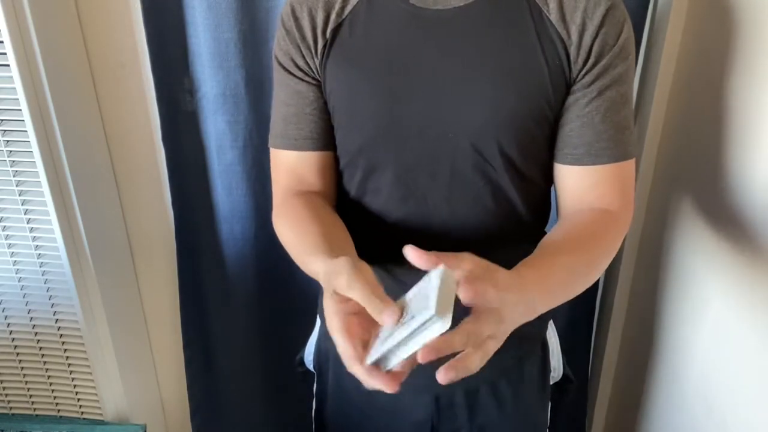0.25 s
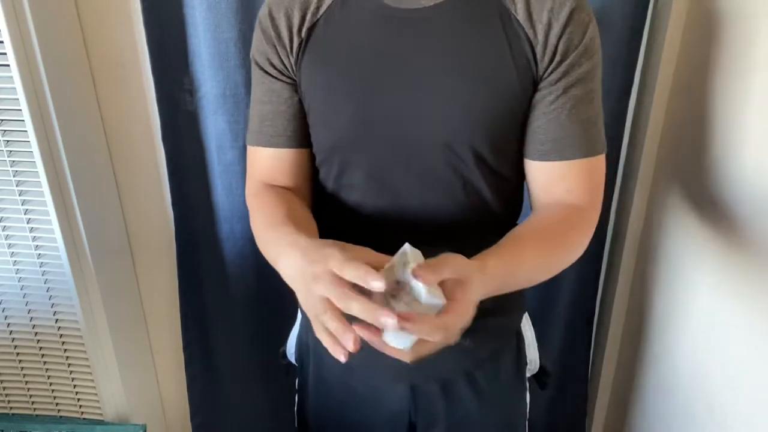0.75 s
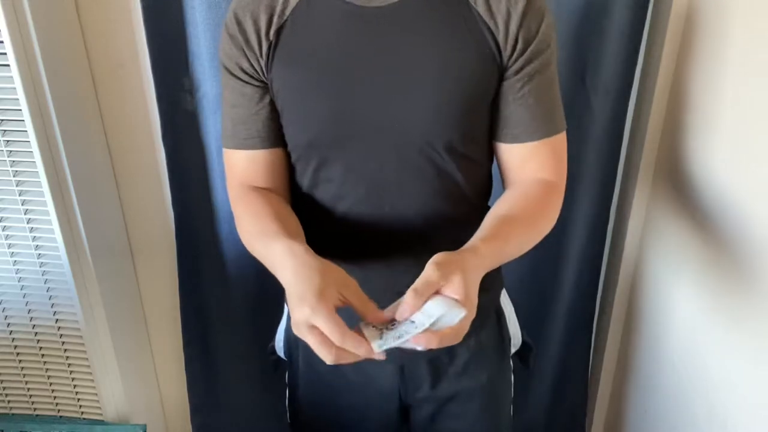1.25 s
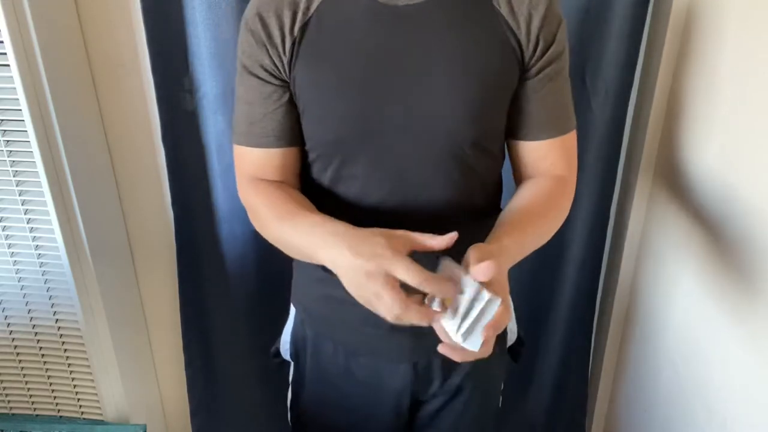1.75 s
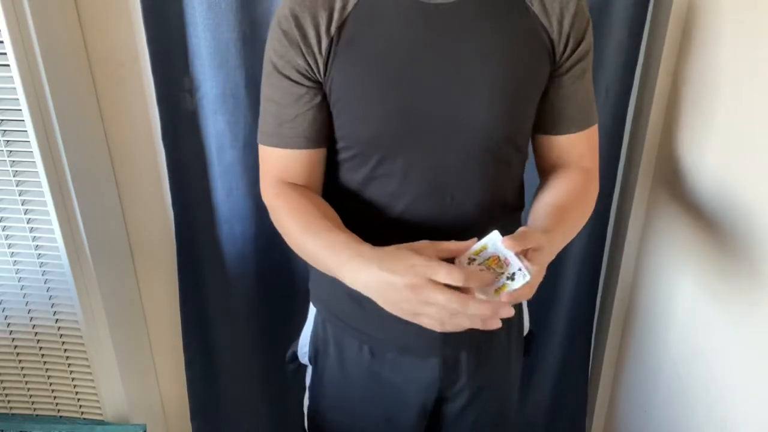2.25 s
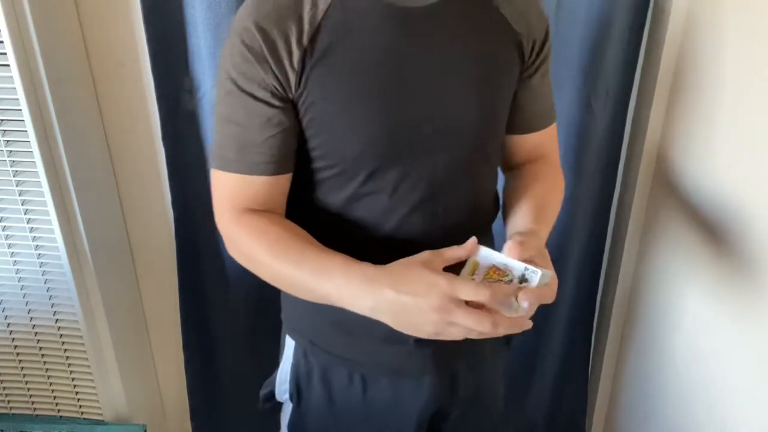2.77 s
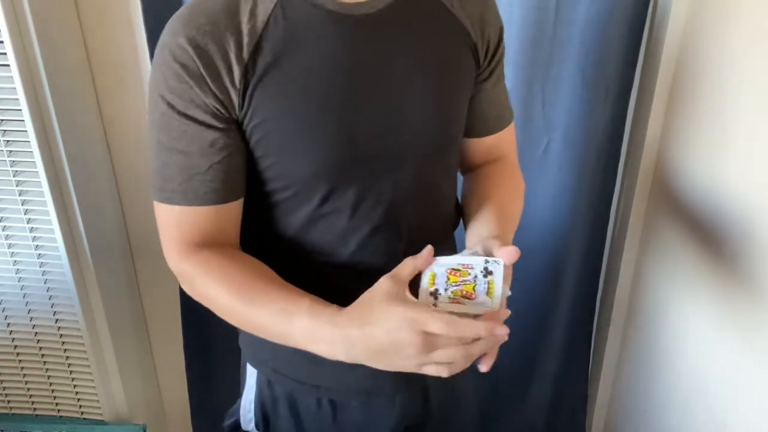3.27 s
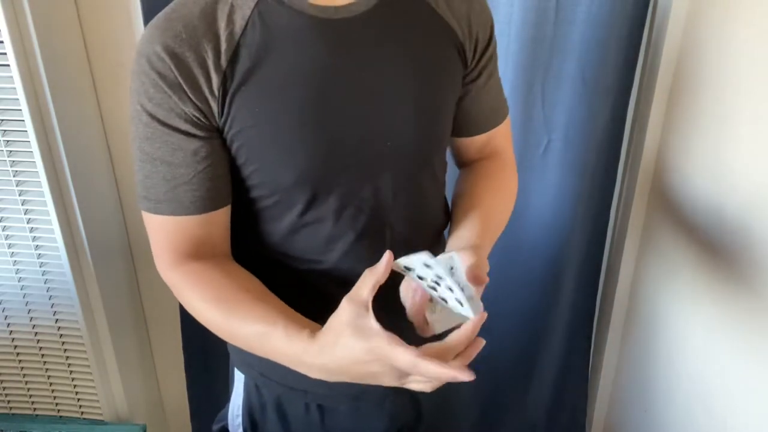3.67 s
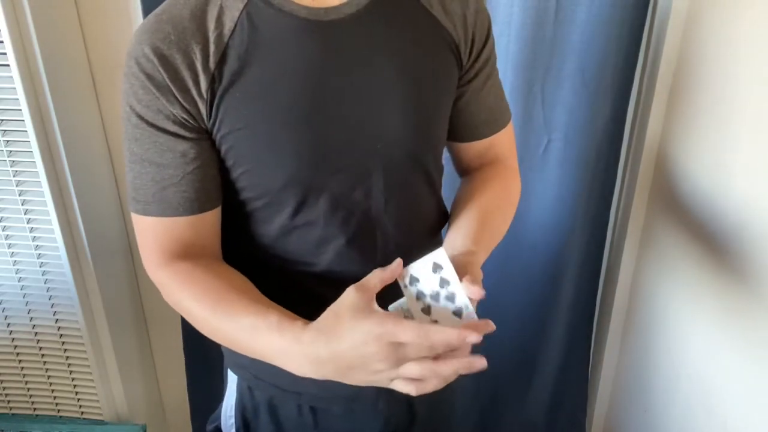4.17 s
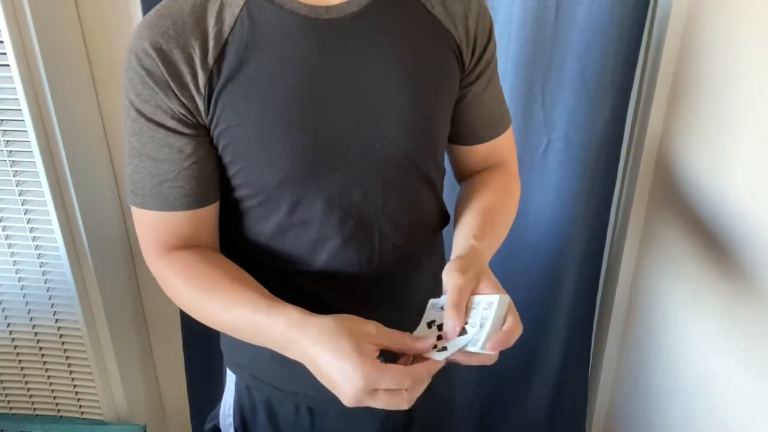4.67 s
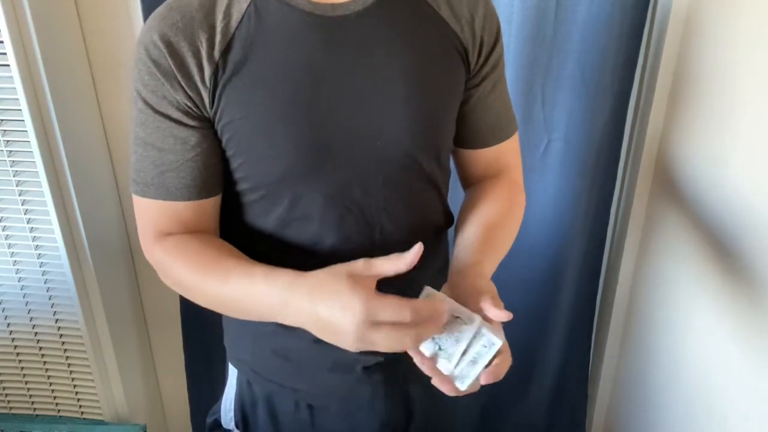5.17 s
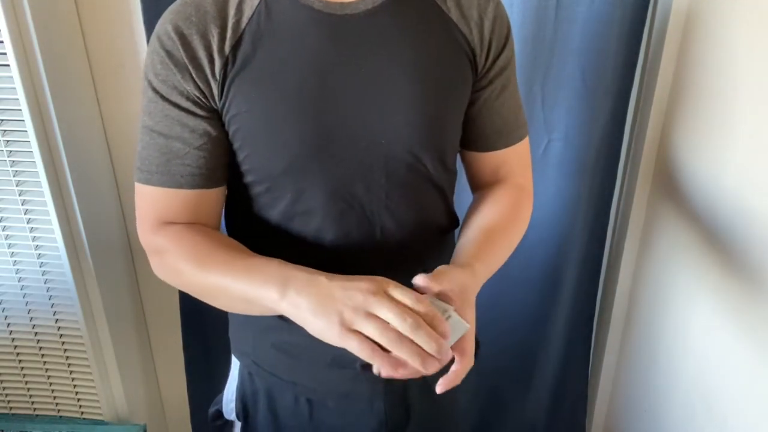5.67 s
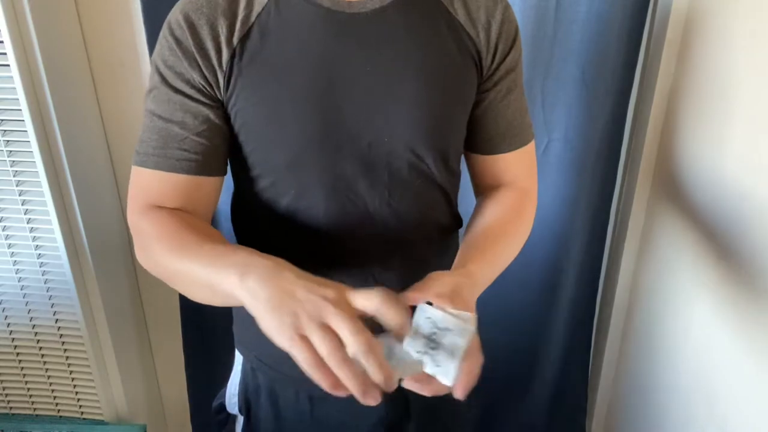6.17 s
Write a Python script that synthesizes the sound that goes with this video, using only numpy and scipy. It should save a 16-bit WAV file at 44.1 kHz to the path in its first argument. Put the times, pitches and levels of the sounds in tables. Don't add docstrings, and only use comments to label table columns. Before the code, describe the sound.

Quiet close handling of a card deck: coated faces hiss, edges tick, a clacking snap and a louder slap, distant motor humming underneath.

```python
import sys
import numpy as np
from scipy import signal
from scipy.fft import rfft, irfft, next_fast_len
from scipy.io import wavfile
from scipy.ndimage import uniform_filter1d

SR = 44100
rng = np.random.default_rng(int(sys.argv[2]) if len(sys.argv) > 2 else 0)


def persist_wave(psi):
    counts = np.round(np.clip(psi, -1, 1) * 32767).astype(np.int16)
    wavfile.write(sys.argv[1], SR, np.atleast_2d(counts).T)


def attenuation_scalar(level_db):
    decades = np.asarray(level_db, float) / 20
    return 10 ** decades


N = 283122
TIME_S = np.arange(N) / SR
FFT_SIZE = next_fast_len(N)
FFT_HZ = np.arange(FFT_SIZE // 2 + 1) * SR / FFT_SIZE


def unit(x):
    return x / np.sqrt(np.mean(x ** 2))


def band(x, low_hz, high_hz):
    edges_hz = [low_hz, min(high_hz, .45 * SR)]
    return signal.sosfilt(signal.butter(2, edges_hz, "band", fs=SR, output="sos"), x)


def colour(x, table):
    pitch_hz, level_db = np.transpose(table)
    gain = attenuation_scalar(np.interp(np.log(FFT_HZ + 1), np.log(pitch_hz), level_db))
    return irfft(rfft(x, FFT_SIZE) * gain, FFT_SIZE)[..., :N]


def walk(rate_hz):
    return 1.2 * np.interp(TIME_S * rate_hz, np.arange(4096), rng.standard_normal(size=4096))


def add(out, start_s, x):
    i = int(round(start_s * SR))
    out[i:i + len(x)] += x[:N - i]


def decay(t, t60_s):
    return np.exp(-np.log(1000) * t / t60_s)


def ring(pitch_hz, t60_s, push_s):
    t = np.arange(int(.15 * SR)) / SR
    return np.sin(2 * np.pi * pitch_hz * t) * decay(t, t60_s) * (1 - np.exp(-t / push_s))


def grit(scatter_db, spread):
    shared, *own = rng.standard_normal(size=(3, N))
    return (shared + spread * np.array(own)) * attenuation_scalar(scatter_db * rng.exponential(size=N))


def strokes(table):
    hold_db = 2.5
    start_s, rise_ms, fall_ms, *levels_db = np.transpose(table)[..., None]
    t = np.arange(0, N + 64, 64) / SR
    shape_db = 20 * np.minimum((t - start_s) / rise_ms, (start_s - t) / fall_ms) * 1000
    shape_db = np.minimum(shape_db + hold_db, 0) - hold_db / 2
    gains = [np.sqrt(np.sum(attenuation_scalar(db + shape_db) ** 2, axis=0)) for db in levels_db]
    return [uniform_filter1d(np.interp(TIME_S, t, gain), size=96) for gain in gains]


def bursts(table, width, lead):
    out, t = np.zeros(N), np.arange(2048) / SR
    noises = rng.standard_normal((len(table), len(t)))
    for (start_s, peak_db, pitch_hz, rise_ms, fall_ms), noise in zip(table, noises):
        top_s = lead * rise_ms / 1000
        shape = np.exp(np.minimum((t - top_s) / rise_ms, (top_s - t) / fall_ms) * 1000)
        burst = band(noise, pitch_hz / width, pitch_hz * width ** 0.77) * shape
        add(out, start_s, attenuation_scalar(peak_db) * burst / np.abs(burst).max())
    return out


def blows(table, push_cycles, spread, side_db):
    out = np.zeros(N)
    for (start_s, peak_db, pitch_hz, t60_s), chance in zip(table, rng.uniform(size=(len(table), 3))):
        push_s = push_cycles / pitch_hz
        ratios = (1 + spread * (0.55 + .5 * chance)) ** np.array([-1, 1, 2])
        neighbours = sum(ring(pitch_hz * r, 0.66 * t60_s, push_s) for r in ratios)
        blow = ring(pitch_hz, t60_s, push_s) + attenuation_scalar(side_db) * neighbours
        add(out, start_s, attenuation_scalar(peak_db) * blow / np.abs(blow).max())
    return out


# pitch_hz, level_db (per Hz)
RUMBLE_COLOUR = [(12, -59), (20, -23.5), (70, 2), (151, -8.5), (183, -9), (290, -14.5), (419, -27.5),
                 (499, -30.5), (900, -46), (1170, -64), (1980, -120)]
# pitch_hz, level_db (per Hz)
AIR_COLOUR = [(400, 10.5), (900, 7.5), (1400, 3), (2400, 2), (3600, -3), (5000, -2), (7500, -5),
              (9600, -2.5), (13000, -8), (14300, -12.5), (15000, -21.5), (16000, -37)]
# time_s, firing_rate_hz, drone_level_db, rumble_swell_db
MOTOR_COURSE = [
    (0, 66.6, -86, 2.5),
    (.8, 68.84, -86, 0.5),
    (1.5, 68.33, -77.5, 3),
    (2.301, 69.3, -67.5, 2),
    (2.9, 70.03, -79, 0.2),
    (3.8, 69.64, -84, -0.5),
    (5, 69.9, -85.5, -1.5),
    (6.42, 70.06, -81, -1),
]
# multiple of the firing rate, level_db
MOTOR_TONES = [(1, 1.5), (2, 0), (3, -1.5), (4, -7)]


def house():
    time_s, *columns = np.transpose(MOTOR_COURSE)
    rate_hz, drone_db, swell_db = (np.interp(TIME_S, time_s, column) for column in columns)
    turn = 2 * np.pi * np.cumsum(rate_hz * (1 + .015 * walk(10))) / SR
    drone = sum(attenuation_scalar(db + drone_db - 1.0 + 4.2 * walk(14.0)) * np.sin(multiple * turn)
                for multiple, db in MOTOR_TONES)
    mid, side = unit(colour(rng.standard_normal(size=(2, N)), RUMBLE_COLOUR))
    rumble = attenuation_scalar(-67 + swell_db) * (mid * attenuation_scalar(1.4 * walk(2.3)) + np.array([[.4], [-.4]]) * side)
    shared, left, right = unit(colour(rng.standard_normal(size=(3, N)), AIR_COLOUR))
    air = attenuation_scalar(-80) * (.5 * shared + 1.355 * np.array([left, right]))
    return drone + rumble + air


# peak_s, rise_ms, fall_ms (each over 20
# dB), hiss_level_db
CARD_SLIDES = [(.062, 22, 53, -79.5), (.126, 50, 48, -70.5), (.245, 21, 100, -74.5), (.302, 61, 48, -63.5),
               (.4, 200, 150, -69.5), (.62, 135, 92, -74), (.788, 170, 44, -77), (.854, 80, 80, -83.5),
               (1.02, 75, 120, -77.5), (1.25, 147, 150, -73), (1.445, 91, 127, -57), (1.602, 57, 170, -72),
               (1.764, 12, 48, -67.5), (1.878, 34, 68, -64.5), (2.068, 38, 157, -61.5),
               (2.17, 110, 45, -68), (2.254, 48, 69, -73.5), (2.39, 220, 44, -77.5),
               (2.548, 75, 160, -79.5), (2.686, 62, 27, -74), (2.792, 38, 47, -79.5), (2.942, 27, 67, -65),
               (3.015, 67, 62, -70.5),
               (3.594, 14, 5, -54), (4.146, 12, 47, -75.5), (4.236, 29, 19, -73), (4.376, 28, 150, -79),
              (4.674, 145, 49, -68), (4.734, 35, 23, -61), (4.785, 80, 30, -65), (4.799, 20, 3.6, -52),
              (5.0, 22, 83, -70.5), (5.026, 10, 41, -66), (5.103, 9.4, 25, -66), (5.114, 20, 67, -90),
              (5.278, 68, 50, -76.5), (5.348, 47, 43, -68), (5.504, 27, 57, -63.5), (5.676, 35, 16, -76),
              (5.72, 30, 48, -75), (5.814, 22, 21, -77.5), (5.921, 60, 72, -57), (6.062, 42, 50, -76.5),
              (6.122, 16, 54, -71.5), (6.223, 6, 64, -55.5), (6.256, 81, 29, -69.5), (6.356, 87, 88, -59)]
# pitch_hz, level_db (per Hz)
HISS_COLOUR = [(900, -28), (1600, -7), (2400, -6), (3400, -6), (5000, -2.5), (6500, -3.5), (8200, -2.5),
               (11000, -0.5), (13200, -6.5), (15300, -10), (16000, -21)]
PATCH_PITCHES = [2200, 4500, 7500]


def slides():
    loud, = strokes(CARD_SLIDES)
    sheen = attenuation_scalar(-8) * (loud / attenuation_scalar(-69.5)) ** -0.11
    hiss = colour(grit(1.5, 1.0) * attenuation_scalar(1.6 * walk(120)), HISS_COLOUR)
    hiss = hiss + sum((attenuation_scalar(3.0 * walk(25)) - 1) * band(hiss, hz / 1.3, hz * 1.3) for hz in PATCH_PITCHES)
    top = band(hiss, 10560, 12000)
    body = hiss - top
    body = body / np.std(band(body[0], 3000, 8100))
    return attenuation_scalar(1.5) * loud * (body + sheen * unit(top) * attenuation_scalar(1.2 * walk(34)))


# start_s, peak_level_db, pitch_hz (centre)
EDGE_TICKS = [(0.0964, -76, 6200), (1.595, -56, 5580), (1.764, -47.5, 4330), (1.78, -54, 4200),
              (1.8726, -51, 6050), (2.0488, -48, 4700), (2.178, -53, 7590), (2.5369, -58, 3700),
              (3.6148, -36.5, 5150), (4.141, -63, 8130), (4.6643, -55, 6280), (4.7264, -61, 7880),
              (4.799, -32, 7140), (5.0392, -44.5, 4600), (5.4975, -51.5, 7160), (5.529, -70, 4180),
              (5.8542, -53, 7030), (6.125, -56.5, 7450), (6.2342, -42, 8360), (6.2515, -41, 3880)]


def ticks():
    rise_ms, fall_ms = 0.4, 1.1
    table = [(*row, rise_ms, fall_ms) for row in EDGE_TICKS]
    return attenuation_scalar(2.0) * bursts(table, 2.7, 1.1)


# start_s, peak_level_db, pitch_hz, t60_s
PACKET_KNOCKS = [(0.126, -48, 1650, 0.015), (1.764, -65.5, 760, 0.032), (1.831, -61, 1334, 0.028),
                 (2.053, -59, 1170, 0.017), (2.085, -53, 1740, 0.031), (2.315, -48.5, 1003, 0.025),
                 (2.551, -58, 762, 0.063), (2.9755, -50.5, 774, 0.013), (3.597, -35.5, 716, 0.038),
                 (3.604, -34, 1447, 0.066), (3.608, -29, 1494, 0.038), (3.6105, -28, 1650, 0.02),
                 (3.617, -25.5, 1003, 0.029), (3.6195, -28.5, 1410, 0.023), (4.999, -54.5, 1280, 0.012),
                 (5.02, -52.5, 1497, 0.069), (5.102, -57.5, 1644, 0.038), (5.267, -60, 1377, 0.02),
                 (5.84, -60, 800, 0.022), (6.222, -53.5, 1880, 0.019), (6.231, -45, 2500, 0.022),
                 (6.253, -52, 2280, 0.023), (6.254, -43, 1685, 0.022)]


def knocks():
    return attenuation_scalar(2.0) * blows(PACKET_KNOCKS, 0.48, 0.29, -5.5)


# peak_s, rise_ms, fall_ms (each over 20 dB),
# rustle_level_db, low_brush_level_db
PALM_RUBS = [(.128, 23, 16, -61.5, -65), (.298, 100, 870, -102, -74), (.75, 68, 74, -79, -88),
             (.836, 18, 170, -86, -73), (1.25, 330, 300, -70, -65.5), (1.48, 117, 167, -61, -66),
             (1.768, 46, 23, -70, -85), (1.928, 106, 48, -75.5, -57.5), (2.058, 18, 350, -64.5, -63.5),
             (2.186, 130, 360, -65, -66), (2.324, 320, 110, -78, -66), (2.546, 140, 210, -73.5, -65),
             (2.608, 170, 27, -75, -64), (2.8, 130, 99, -98, -74.5), (2.984, 84, 210, -75.5, -63),
             (4.1, 30, 300, -83.5, -77), (4.388, 87, 110, -86, -81), (4.6, 370, 127, -84, -74),
                (4.666, 50, 170, -72.5, -85), (4.79, 250, 11, -68.5, -65.5), (5.02, 36.6, 108, -64.5, -60),
                (5.274, 31, 68, -71.5, -81.5), (5.42, 64, 200, -97.5, -78), (5.514, 150, 120, -90, -83),
                (5.68, 60, 87, -97, -77), (5.848, 31, 46, -93, -62), (5.906, 42, 112, -66, -76),
                (5.991, 88, 183, -85, -70.5), (6.222, 5, 120, -57, -57), (6.26, 33, 18, -56.5, -47.5),
                (6.35, 110, 90, -68.5, -73)]
# pitch_hz, width_hz, level_db
PALM_HOLLOWS = [(700, 400, -6.5), (1090, 300, 0), (1600, 604, -0.5), (2110, 860, -2), (3030, 1500, -9)]


def rubs():
    rustle, brush = strokes(PALM_RUBS)
    catches = grit(2.9, 1.0)
    hollow = sum(attenuation_scalar(db + 1.5 * walk(30)) * band(catches, hz - width_hz / 2, hz + width_hz / 2)
                 for hz, width_hz, db in PALM_HOLLOWS)
    low = attenuation_scalar(-6.0) * unit(band(catches, 77, 550))
    return attenuation_scalar(1.5) * (rustle * unit(hollow) + brush * low)


# start_s, peak_level_db
CORNER_FLICKS = [(0.4622, -51), (1.734, -65), (4.0872, -75), (4.3616, -59.5), (4.998, -50.5), (5.0198, -42),
                 (5.0794, -63.5), (5.0954, -57), (5.102, -50.5), (5.1699, -74.5), (5.8119, -56),
                 (6.2228, -42.5)]


def flicks():
    pitch_hz, rise_ms, fall_ms = 6800, 0.1, 0.35
    table = [(*row, pitch_hz, rise_ms, fall_ms) for row in CORNER_FLICKS]
    return attenuation_scalar(9.5) * bursts(table, 3.5, 7)


# peak_s, rise_ms, fall_ms, rasp_level_db, pitch_hz
CORNER_SCRAPES = [
    (1.22, 180, 170, -77, 1090),
    (1.775, 20, 45, -64, 4340),
    (2.08, 35, 100, -57.5, 4380),
    (2.26, 170, 160, -69, 1070),
    (2.52, 69, 94, -73.5, 1200),
    (5.915, 38, 90, -63.5, 1530),
    (6.275, 40, 200, -66.5, 2300),
    (6.335, 47, 71, -65.5, 2400),
    (6.388, 25, 44, -55.5, 2480),
]


def scrapes():
    catches = grit(2.2, 0.54) * attenuation_scalar(1.4 * walk(60))
    out = np.zeros((2, N))
    for *stroke, pitch_hz in CORNER_SCRAPES:
        loud, = strokes([stroke])
        out += loud * unit(band(catches, pitch_hz / 1.13, pitch_hz * 1.13))
    return out


# start_s, peak_level_db, pitch_hz, t60_s
PALM_THUMPS = [(2.546, -56, 140.6, 0.099), (2.601, -51.5, 95, 0.067), (2.973, -43.5, 151.6, 0.042),
               (3.596, -42, 700, 0.048), (3.602, -32, 123.8, 0.034), (3.618, -37.5, 210, 0.054),
               (4.807, -38.5, 163.8, 0.06), (4.812, -36.5, 215.4, 0.055), (5.838, -54, 210, 0.14),
               (6.243, -57, 162, 0.029), (6.263, -51.5, 229, 0.098)]


def thumps():
    return blows(PALM_THUMPS, 0.3, 0.76, -4.0)


# start_s, peak_level_db, pitch_hz, rise_ms, fall_ms
SLAP_PUFFS = [
    (3.5958, -19.5, 7590, 1.233, 0.9),
    (3.598, -36, 4000, 1.0, 4.6),
    (3.606, -38, 2400, 1.5, 7.3),
    (3.615, -38.5, 4200, 1.4, 8),
    (4.796, -36, 2500, 1.5, 5),
    (4.8105, -24, 2500, 0.99, 4.2),
    (4.813, -33, 3335, 0.4, 0.4),
    (4.818, -30.5, 2986, 0.77, 4.9),
]


def puffs():
    return bursts(SLAP_PUFFS, 1.9, 2.1)


# start_s, blow_level_db
SNAP_BLOWS = [
    (4.8089, -32),
    (4.8098, -23),
    (4.8123, -10.5),
    (4.8179, -27.5),
    (4.821, -32),
]
# pitch_hz, level_db, t60_s
CARD_TONES = [(832, -24, 0.03), (1128, -13.5, 0.03), (1420, -13, .014), (1600, 2.5, 0.017),
              (1744, -4, 0.012), (2035, -3.5, .025), (2267, -5, .022), (2570, -9.5, 0.023),
              (3020, -5.5, 0.025), (3830, -10.5, 0.032), (4650, -13, 0.012), (6160, -20, 0.0082)]


def snap():
    contact_s = 0.0003
    front, sideways = np.zeros((2, N))
    chances = rng.standard_normal((len(SNAP_BLOWS), len(CARD_TONES)))
    for (start_s, blow_db), chance in zip(SNAP_BLOWS, chances):
        for (pitch_hz, tone_db, t60_s), luck in zip(CARD_TONES, chance):
            level_db = blow_db + tone_db
            add(front, start_s, -attenuation_scalar(level_db + 1.2 * luck) * ring(pitch_hz, t60_s, contact_s))
            add(sideways, start_s, -attenuation_scalar(level_db + 5.5) * ring(pitch_hz, 0.25 * t60_s, contact_s))
    return front, sideways


# pitch_hz, t60_s, level_db
WALL_ECHOES = [(147, 0.58, -39), (490, 0.15, -27), (1200, 0.26, -32.5), (2500, 0.25, -23),
               (4960, 0.24, -19.5), (9900, 0.25, -22)]


def room(x):
    t = np.arange(SR // 2) / SR
    rise = np.clip((t - .010) / 0.0089, 0, 1)
    echo = sum(attenuation_scalar(db) * unit(band(rng.standard_normal((2, len(t))), hz / 1.534, hz * 1.486)) * decay(t, t60_s)
               for hz, t60_s, db in WALL_ECHOES)
    near = band(rng.standard_normal((2, len(t))), 170, 12000) * decay(t, 0.019)
    near = attenuation_scalar(-10.5) * near / np.sqrt(np.mean(np.sum(near ** 2, axis=1)))
    return signal.fftconvolve(x[None], attenuation_scalar(-23) * rise * echo + near, axes=1)[:, :N]


def scene():
    hits = ticks() + flicks() + puffs() + knocks() + thumps()
    front, sideways = snap()
    friction = slides() + rubs()
    echoes = room(hits + sideways + friction[0])
    return hits + front + friction + echoes + house() + scrapes()


# pitch_hz, left_lead_rad
STEREO_PHASE = [(0, 0), (900, -.7), (1900, -1.1), (2900, -2.1), (4200, -3.6), (6000, -3.7), (6500, -6.9),
                (8000, -6.28), (8700, -5.7), (9950, -3.2), (10850, -3.05), (12400, -.2), (13700, .2),
                (14800, 3.14)]


def phone_stereo(dry):
    left, right = rfft(dry, FFT_SIZE)
    shared = np.clip((FFT_HZ - 6800) / 700 + .5, 0, .95)
    mid = (left + right) / 2
    phase = np.exp(1j * np.interp(FFT_HZ, *np.transpose(STEREO_PHASE)))
    left = (left + shared * (mid - left)) * attenuation_scalar(-0.5 * (5.0 - shared)) * phase
    right = right + shared * (mid - right)
    return irfft(np.array([left, right]), FFT_SIZE)[:, :N]


def roll_off(x):
    return signal.sosfilt(signal.butter(12, 15510, fs=SR, output="sos"), x)


def record(dry):
    return roll_off(phone_stereo(dry))


dry = scene()
out = record(dry)
persist_wave(out)
```